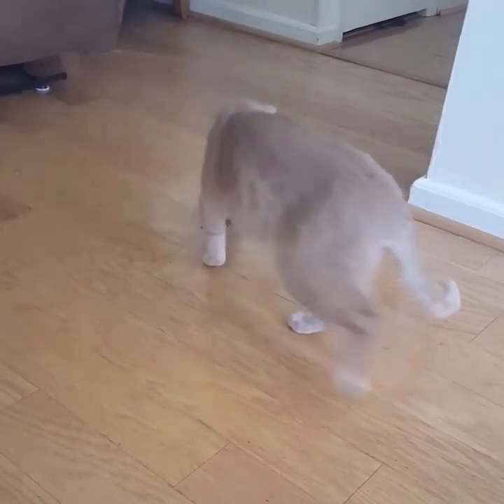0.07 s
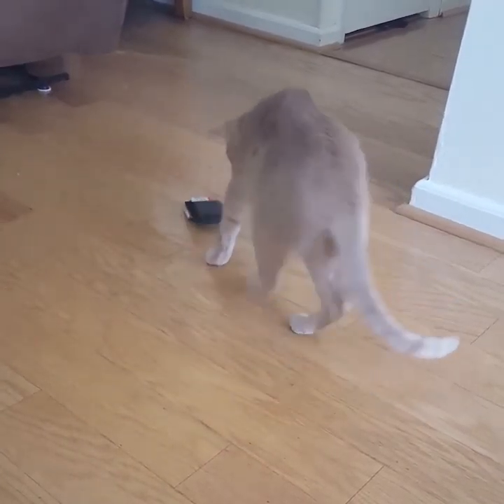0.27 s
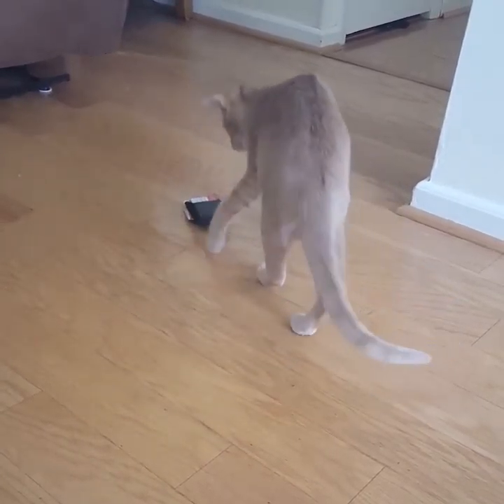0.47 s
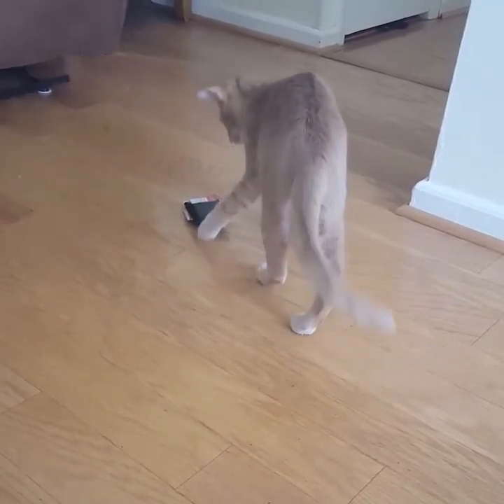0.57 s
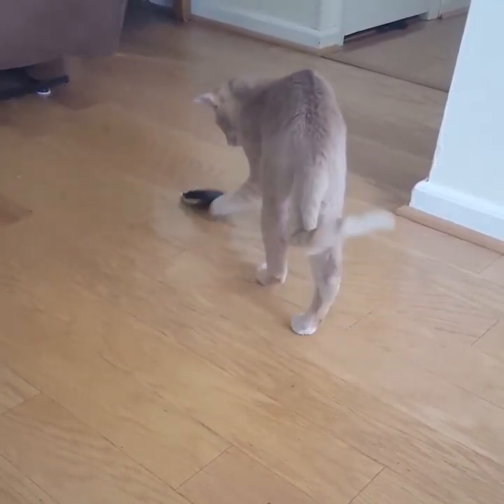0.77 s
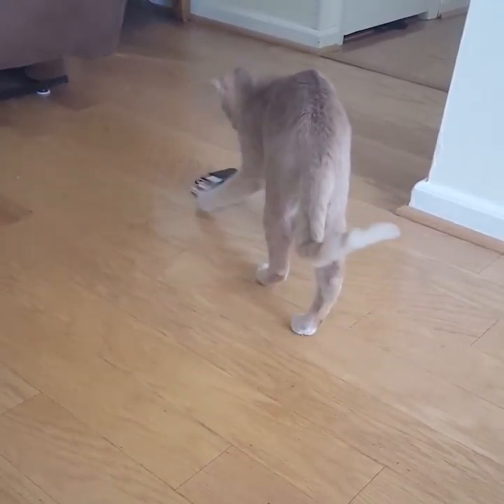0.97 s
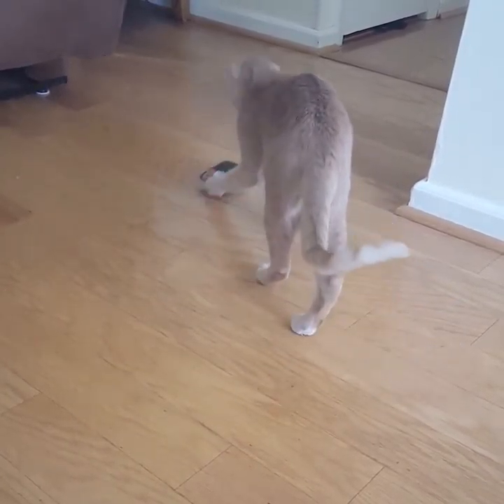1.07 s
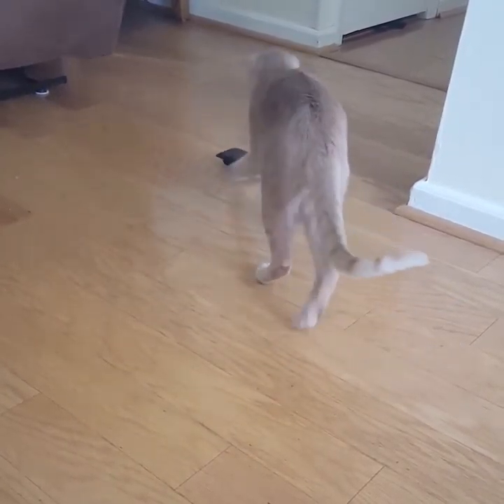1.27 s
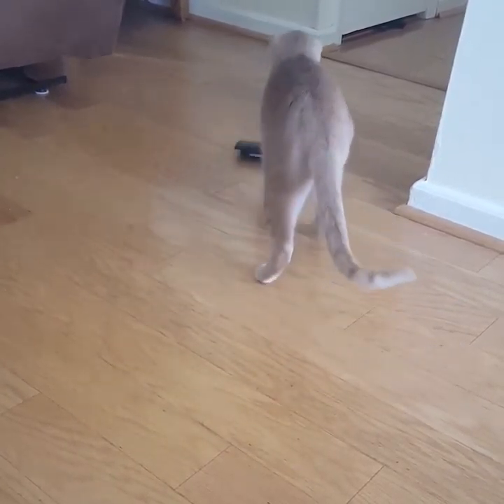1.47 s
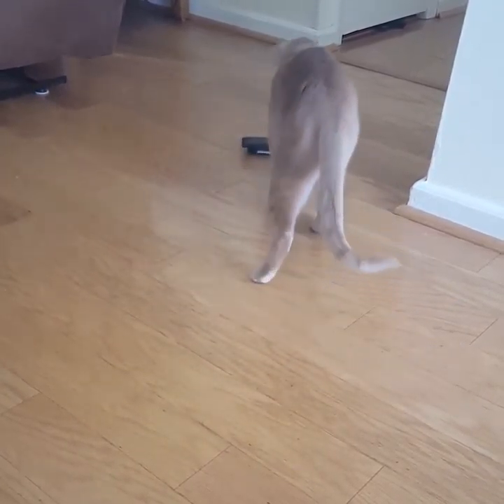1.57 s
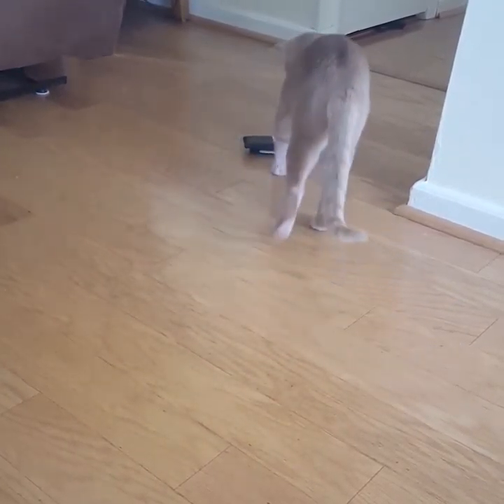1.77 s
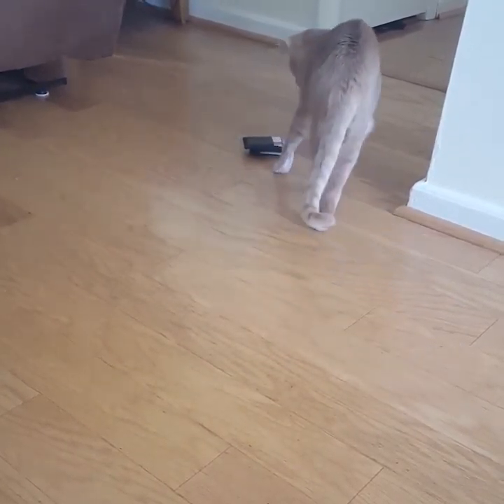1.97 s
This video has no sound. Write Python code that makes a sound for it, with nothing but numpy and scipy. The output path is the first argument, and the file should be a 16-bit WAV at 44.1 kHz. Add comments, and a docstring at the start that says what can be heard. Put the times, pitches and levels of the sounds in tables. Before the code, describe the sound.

A wallet hits a wooden floor at about 0.2 s in a rapid, rattling cluster of clacks, then knocks sharply at 0.4 and 0.5 s with brief scrapes. After a lull, a thin sliding hiss starts near 0.9 s. Softer knocks and dry, raspy scrapes follow from 1.1 to 1.9 s, with a knock cluster at 1.7 s. Faint paw thumps, room echo and a quiet steady hum accompany it.

```python
"""Cat batting a wallet about

A wallet lands on a wooden floor in a bare, echoing room, tumbles, clacks flat, slides with a thin hiss,
then scrapes and knocks along the boards. Knocks are filtered pushes, cracks and rattles; scrapes and hiss
are random stick-slip clicks; paw falls are short low sines. Filtered noise makes the faint appliance hum."""
import sys
import numpy as np
from scipy import signal
from scipy.fft import rfft, irfft
from scipy.io import wavfile

SR = 44100
rng = np.random.default_rng(int(sys.argv[2]) if len(sys.argv) > 2 else 0)


def store_pcm(level_fs):
    """Save levels as 16-bit WAV."""
    pcm = np.round(np.clip(level_fs, -1, 1) * 32767).astype(np.int16)
    wavfile.write(sys.argv[1], SR, np.atleast_2d(pcm).T)


N = 88200


def amp(db):
    """Decibels to gain."""
    return 10 ** (np.asarray(db) / 20)


def unit(x):
    """Scales to an rms of one."""
    return x / np.sqrt(np.mean(x ** 2) + 1e-20)


def read(points, hz):
    """Interpolates a table on a log-frequency axis."""
    point_hz, value = np.transpose(points)
    return np.interp(np.log(hz + 1), np.log(point_hz + 1), value)


def add(mix, start_s, sound):
    """Mixes a sound in at a time, cut at the end of the mix."""
    part = mix[round(start_s * SR):][:len(sound)]
    part += sound[:len(part)]


def colour(x, points):
    """Filters by a table of (Hz, dB)."""
    gain = amp(read(points, np.fft.rfftfreq(len(x), 1 / SR)))
    return irfft(rfft(x) * gain, len(x))


def bump(hz, centre_hz, octaves):
    """A bell of height one on a log-frequency axis."""
    return np.exp(-.5 * (np.log2((hz + 1) / centre_hz) / octaves) ** 2)


def hum():
    """Steady room tone as coloured noise, plus narrow, wavering noise bands of a running appliance."""
    # Room tone spectrum. Each row: frequency in Hz, relative density in dB per Hz.
    air_colour = [(15, -41), (25, -47), (48, -9), (115, -5), (146, -9), (167, -10.5), (237, -2),
                  (271, -8.5), (543, -15), (978, -20), (1150, -23.5), (1280, -23), (4870, -36.5),
                  (12400, -71), (15000, -43)]
    # Appliance bands. Each row: centre in Hz, width in Hz, rms level in dB.
    hum_bands = [(178.4, 9.8, -58.5), (242, 45, -57), (293.4, 9.8, -61.5), (1230, 6.5, -71),
                 (1120, 8.6, -69.5)]
    air_db = -55.5
    hz = np.fft.rfftfreq(N, 1 / SR)
    out = amp(air_db) * unit(colour(rng.standard_normal(N), air_colour))
    for centre_hz, width_hz, db in hum_bands:
        band = 1 / (1 + (2 * (hz - centre_hz) / width_hz) ** 2)
        random_phase = np.exp(2j * np.pi * rng.random(len(hz)))
        out += amp(db) * unit(irfft(band * random_phase, N))
    return out


def burst(seconds, size=1024):
    """A grainy noise puff of unit energy that swells and dies within a few time constants."""
    grain_db = 0.5
    t = np.arange(size) / SR
    grains = rng.standard_normal(size) * amp(grain_db * rng.standard_normal(size))
    puff = grains * t / seconds * np.exp(-t / seconds)
    return puff / np.linalg.norm(puff)


def spread(x):
    """Bending waves in the boards travel at different speeds; an all-pass blunts a sharp push likewise."""
    centre_hz, q = 2040, 0.43
    _, a = signal.iirpeak(centre_hz, q, fs=SR)
    return signal.lfilter(a[::-1], a, x)


def pulse(tables, ring_hz, size=4096):
    """Minimum-phase pulse: the sharpest causal one with the summed dB tables and one short resonance."""
    ring_db, ring_octaves = 7, 0.19
    hz = abs(np.fft.fftfreq(size, 1 / SR))
    gain_db = sum(read(table, hz) for table in tables) + ring_db * bump(hz, ring_hz, ring_octaves)
    log_gain = np.log(amp(gain_db))
    spectrum = np.exp(np.conj(signal.hilbert(log_gain)))
    return np.fft.ifft(spectrum).real[:size // 2]


def knocks(size=1024):
    """Each blow is a soft push, a crack of uneven contact and a rattle, with its own hollow ring and echo."""
    # Wallet blows. Each row: start in seconds, bass, middle, treble and top gain in dB,
    # rattle gain in dB, ring in Hz.
    blows = [(0.224, 7.5, -22.5, -24, -25, -31, 700), (0.2365, 10, -3, -7, -15, -9, 810),
             (0.2416, 10.5, 0.5, -5.5, -5, -16.5, 610), (0.2565, 0, 5.5, 1, -8, 5.5, 408),
             (0.2595, 3.5, 7.5, 5.5, -14, -16, 3200), (.262, 2.5, 6, 7.5, -13.5, 0, 1040),
             (.265, -17, -4, 3.5, -8.5, -1, 3540), (0.2694, 0, -4, 1.5, -7, -9, 1050),
             (0.4129, -0.5, 7, 3.5, -4.5, -4, 740), (0.5051, -5, 1, -2.5, -14, -1.5, 2580),
             (1.0939, 1, -6, -12, -17, -4.5, 256), (1.103, -22, -8, -6.5, -33, 0, 1620),
             (1.139, -9.5, -4.5, -33, -42, 4.5, 1300), (1.175, -4, -1.5, -11, -21.5, -1.5, 4730),
             (1.291, -23, -3, -15.5, -32, -1.5, 4030), (1.362, -21, -3, -13, -17.5, -5, 1000),
             (1.3686, -22, -6, -23, -27, 2, 2120), (1.6935, -4, 5, -11.5, -28, -1, 910),
             (1.701, -9, 0.5, -8, -38, -3.5, 930), (1.7093, -19, -13, -12, -27, -12, 4300),
             (1.715, -12, -7, -25, -27, 0, 960), (1.7286, -6, -8, -14, -25, -10, 790)]
    # Frequencies of the four band gains in Hz.
    band_hz = [450, 1400, 3400, 9000]
    # Colour common to all blows. Each row: frequency in Hz, gain in dB.
    knock_colour = [(30, -20), (100, -13.5), (170, -8), (300, -2), (450, 0.5), (800, 1.5), (1400, -1.5),
                    (1800, 4.5), (2400, -2.5), (3100, -1), (4200, -4.5), (5500, -1), (7000, -7), (9300, -9),
                    (11000, -19.5), (15000, -16.5)]
    crack_above_hz, crack_s, crack_db = 3240, 0.002, -1.5
    rattle_s = 0.0029
    out = np.zeros(N)
    low_pass = signal.butter(2, crack_above_hz, fs=SR)
    high_pass = signal.butter(2, crack_above_hz, "high", fs=SR)
    push = spread(signal.lfilter(*low_pass, signal.unit_impulse(size)))
    for start_s, *bands_db, rattle_db, ring_hz in blows:
        crack = signal.lfilter(*high_pass, burst(crack_s))
        force = push + amp(crack_db) * crack + amp(rattle_db) * burst(rattle_s)
        response = pulse([knock_colour, list(zip(band_hz, bands_db))], ring_hz)
        blow = np.zeros(SR)
        add(blow, 0, -signal.fftconvolve(force, response))
        add(out, start_s, room(blow))
    return out


def boards(x):
    """The floorboards ring briefly, as decaying cosines, with whatever strikes or rubs them."""
    # Floorboard modes. Each row: frequency in Hz, relative level in dB, t60 in seconds.
    modes = [(243.8, -31.5, 0.13), (348.6, -43, 0.26), (403, -37.5, 0.19), (464.2, -37, 0.14),
             (591, -35, 0.099), (753, -51, 0.31), (871, -42, 0.16), (995, -44.5, 0.15), (3050, -41, 0.046)]
    ring_db = -14.0
    t = np.arange(SR // 2) / SR
    ring = sum(amp(db - 60 * t / t60_s) * np.cos(2 * np.pi * hz * t) for hz, db, t60_s in modes)
    return x + amp(ring_db) * signal.fftconvolve(x, ring)[:N]


def room(x, size=256):
    """Direct sound, strong early reflections and a dense tail, each band dying at its own speed."""
    # Reverberation time. Each row: frequency in Hz, t60 in seconds.
    t60_points = [(100, 0.1), (400, 0.55), (1200, 0.46), (2600, 0.55), (5000, 0.42), (10000, 0.45)]
    # Reverberation strength. Each row: frequency in Hz, gain in dB.
    wet_points = [(100, -7), (450, -1), (1200, 2), (3000, 5), (6000, 1), (12000, -4)]
    delay_s, build_s, taps_per_s = 0.0011, 0.0065, 6000
    early_db, early_s = 7.5, 0.006
    t = np.arange(SR * 3 // 4) / SR
    taps = unit(rng.choice([-1., 1.], len(t)) * (rng.random(len(t)) < taps_per_s / SR))
    taps *= np.clip((t - delay_s) / build_s, 0, 1) * amp(early_db * np.exp(-t / early_s))
    hz, age_s, bands = signal.stft(taps, SR, nperseg=size)
    fall_per_s = np.log(1000) / read(t60_points, hz)[:, None]
    level = np.sqrt(2 * fall_per_s / SR)  # offsets the greater energy of a longer decay
    bands = bands * np.exp(-fall_per_s * age_s) * level * amp(read(wet_points, hz))[:, None]
    tail = signal.istft(bands, SR, nperseg=size)[1]
    return x + signal.fftconvolve(x, tail)[:len(x)]


def slips(per_s, grain_db, size=N):
    """A random train of tiny stick-slip clicks of uneven strength and random sign."""
    strength = amp(grain_db * np.minimum(rng.exponential(1, size), 4)) * rng.choice([-1, 1], size)
    return strength * (rng.random(size) < per_s / SR)


def scrapes():
    """Pressed by a paw, the wallet catches on the grain in short swelling strokes, each with its own rasp."""
    # Strokes along the boards. Each row: start in seconds, length in seconds, level in dB,
    # share of the length spent rising, rasp in Hz, rasp gain in dB.
    strokes = [(0.289, 0.098, -47.5, 0.5, 3530, 20), (0.415, 0.035, -31.5, 0.58, 1550, 4),
               (0.509, 0.049, -41.5, .25, 2220, 4.5), (0.575, 0.17, -56, 0.2, 2400, -6),
               (1.015, 0.027, -55, 0.31, 750, 15), (1.094, 0.12, -42.5, 0.34, 1400, 0),
               (1.271, 0.2, -44, 0.47, 2270, 2), (1.43, 0.26, -50.5, 0.13, 2160, -6),
               (1.599, 0.11, -38.5, 0.49, 1640, 9.5), (1.724, 0.18, -52, 0.19, 2400, 1.5)]
    # Rubbing spectrum. Each row: frequency in Hz, relative density in dB per Hz.
    scrape_colour = [(100, -10), (400, -11), (700, -5), (1000, 2), (1600, -2), (2300, -3.5), (3200, -11.5),
                     (4300, -15), (7500, -31), (11000, -33.5), (15000, -37)]
    slips_per_s, grain_db, rasp_octaves = 3600, 2, 0.17
    t, hz = np.arange(SR) / SR, np.fft.rfftfreq(SR, 1 / SR)
    out = np.zeros(N)
    for start_s, length_s, db, rise, rasp_hz, rasp_db in strokes:
        stroke = np.interp(t, [0, length_s * np.clip(rise, .05, .95), length_s], [0, 1, 0])
        swell = np.sin(stroke * np.pi / 2)
        rasp = rasp_db * bump(hz, rasp_hz, rasp_octaves)
        clicks = slips(slips_per_s, grain_db, size=SR)
        rub = irfft(rfft(clicks) * amp(read(scrape_colour, hz) + rasp))
        add(out, start_s, room(amp(db) * swell * unit(rub)))
    return out


def paws():
    """A padded paw gives the floor a dull, short thump: a low sine that swells and dies."""
    # Paw falls. Each row: start in seconds, envelope peak in dB.
    falls = [(0.416, -49.5), (1.093, -48)]
    thump_hz, thump_s = 146, 0.011
    t, out = np.arange(SR // 4) / SR, np.zeros(N)
    envelope = t / thump_s * np.exp(1 - t / thump_s)
    thump = envelope * np.sin(2 * np.pi * thump_hz * t)
    for start_s, db in falls:
        add(out, start_s, amp(db) * thump)
    return out


def glide():
    """Light sliding on the varnish: very fine, dense slips that make a thin hiss."""
    # Hiss level, interpolated in time. Each row: time in seconds, level in dB.
    glide_level = [(0.821, -72.5), (0.887, -64), (0.915, -52.5), (0.972, -58), (1.03, -51.5),
                   (1.085, -60.5), (1.12, -81), (1.23, -65), (1.29, -57), (1.34, -62), (1.41, -54),
                   (1.479, -62.5), (1.57, -60), (1.65, -59), (1.75, -59), (1.85, -65.5), (1.95, -74.5)]
    # Hiss spectrum. Each row: frequency in Hz, relative density in dB per Hz.
    glide_colour = [(200, -82), (1000, 8.5), (3800, 3.5), (6000, 9), (9500, 6.5), (11000, 0.5),
                    (14500, 6.5)]
    slips_per_s, grain_db = 16000, 2.5
    level = amp(np.interp(np.arange(N) / SR, *np.transpose(glide_level)))
    return level * unit(colour(slips(slips_per_s, grain_db), glide_colour))


def scene():
    """Knocks and scrapes with room echo ring the boards; the glide echoes; paws and hum are added dry."""
    wallet = boards(knocks() + scrapes()) + room(glide())
    return (wallet + paws() + hum())[None]


def record(dry):
    """Limits the band with a linear-phase low-pass."""
    edge_hz = 14750
    low_pass = signal.firwin(511, edge_hz, window=("kaiser", 9), fs=SR)
    return signal.oaconvolve(dry, low_pass[None], "same")


dry = scene()
out = record(dry)
store_pcm(out)
```